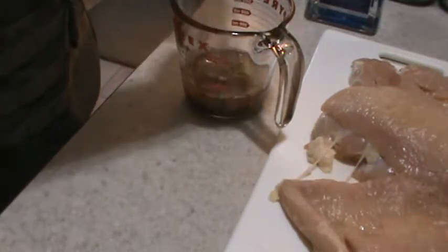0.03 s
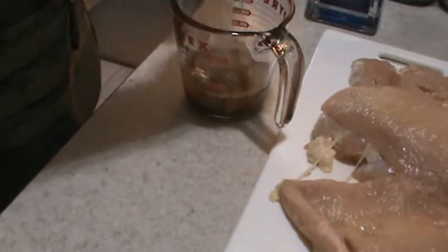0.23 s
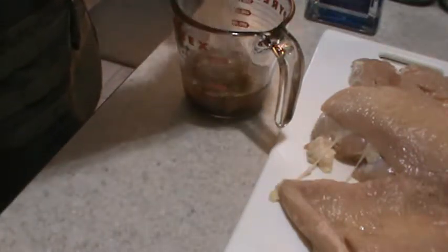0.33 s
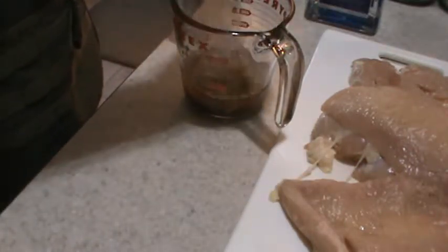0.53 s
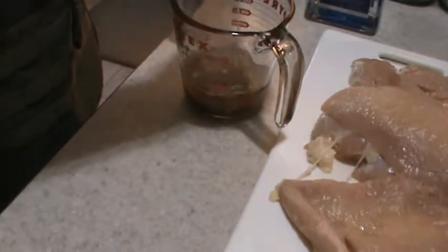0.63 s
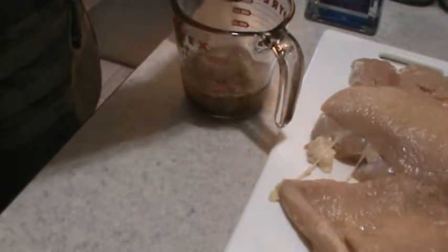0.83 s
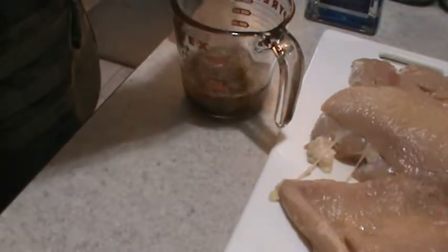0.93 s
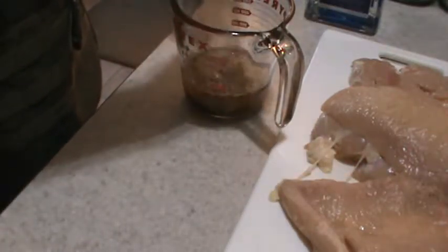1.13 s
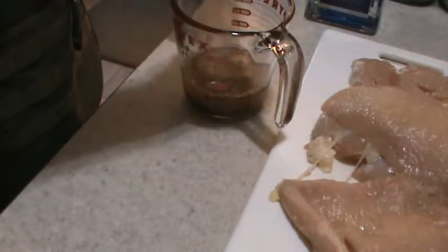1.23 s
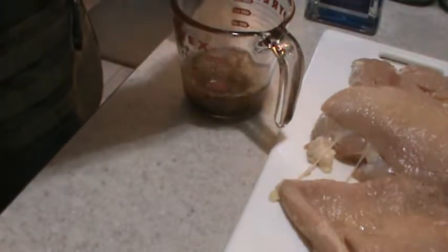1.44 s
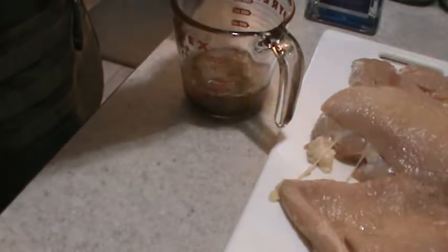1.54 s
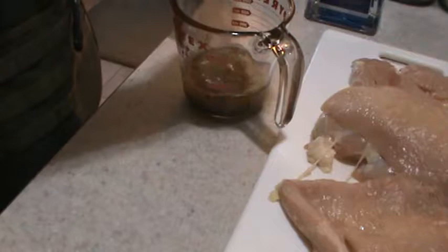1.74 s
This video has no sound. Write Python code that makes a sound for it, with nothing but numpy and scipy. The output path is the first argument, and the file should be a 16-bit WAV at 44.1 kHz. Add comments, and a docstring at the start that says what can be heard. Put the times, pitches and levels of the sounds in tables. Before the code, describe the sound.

Thick sauce splutters from a nearly empty squeeze bottle into a glass cup.

```python
"""Thick sauce is squeezed from a nearly empty bottle into a glass measuring cup on a kitchen counter.
Fingers shift their grip, then air and sauce splutter through the nozzle: bubbles pop in a crackling
spray while the air in the bottle gulps. As the flow dies, the last drips make the glass ring faintly.
The nozzle draws air again with sticky ticks, one with a splashy tail; a soft bump and faint finger rubs
come near the end. An appliance hums in the small room throughout."""
import sys
import numpy as np
from scipy import signal
from scipy.fft import rfft, irfft
from scipy.io import wavfile

SR = 44100
rng = np.random.default_rng(int(sys.argv[2]) if len(sys.argv) > 2 else 0)


def generate_wav(sig):
    """Save sig (samples, or channels by samples) to the path in sys.argv[1] as 16-bit PCM at SR."""
    pcm = np.round(np.clip(np.atleast_2d(sig).T, -1, 1) * 32767).astype(np.int16)
    wavfile.write(sys.argv[1], SR, pcm)


N = 79380
T = np.arange(N) / SR

# Bubbles bursting at the nozzle. Each row: start in seconds, pitch in Hz, ring level in dB,
# decay in seconds, wet crack against the ring in dB before CRACK_TRIM_DB.
NOZZLE_POPS = [(.1025, 4030, -38.5, 0.00061, -26), (.127, 4100, -36.5, 0.00067, -25),
               (.145, 6900, -37.5, 0.002, -32), (.1655, 6150, -38, 0.0037, -9),
               (.2015, 1920, -32, 0.0014, 7.5), (.2185, 7400, -29, 0.0018, -2),
               (.2218, 3680, -15, 0.0012, -3), (.2232, 2570, -15.5, 0.0017, -1),
               (.2297, 2190, -14, 0.0013, -5), (.2472, 3020, -17.5, 0.00038, -4),
               (.2765, 2940, -13, 0.0014, -6), (.2893, 2455, -9.5, 0.00086, -4),
               (.3448, 2247, -19.5, 0.0027, 2.5), (.366, 4680, -29.5, 0.0049, 7),
               (.3728, 6880, -23.5, 0.0035, 3.5), (.4177, 2690, -15, 0.00056, -0.5),
               (.4238, 3560, -29, 0.001, -11), (.4398, 6640, -30.5, 0.0017, 10),
               (.438, 1220, -32.5, 0.0056, -10), (.474, 9120, -21, 0.0028, 5.5),
               (.5098, 6940, -19.5, 0.002, 6.5), (.526, 5750, -28, .002, -5),
               (.5365, 4500, -15.5, 0.00069, -2), (.544, 9370, -18, 0.00069, -2),
               (.576, 2290, -32, 0.00091, 15.5), (.5938, 6700, -20.5, 0.00075, -11),
               (.6792, 3040, -36, 0.0026, 9), (.6913, 2040, -35.5, 0.00091, -14),
               (.7039, 7000, -50, 0.002, 16), (.7418, 2450, -32, 0.0014, 3), (.7487, 4300, -42, 0.0017, 11),
               (.782, 1240, -38, 0.0031, 5), (.792, 3720, -38.5, 0.0007, 6.5)]
# Sticky ticks as the nozzle draws air again. Each row: start in seconds, pitch in Hz,
# ring level in dB, wet crack against the ring in dB before CRACK_TRIM_DB.
STICKY_TICKS = [(.883, 10070, -37.5, 2), (0.9008, 13300, -26, 5), (0.9009, 10100, -32, -15),
                (.950, 12530, -37, 2.5), (1.0207, 2400, -52, 7), (1.1753, 5000, -53, 17),
                (1.2845, 2330, -51, 5), (1.4653, 2270, -39.5, 12), (1.6873, 9120, -29.5, -9),
                (1.689, 3940, -38.5, -9)]
POP_ATTACK_S, POP_RISE_OCT_PER_S, POP_WOBBLE_OCT, TICK_DECAY_S = 0.001264, 20, 0.07, 0.00097
CRACK_LOW_RATIO, CRACK_TOP_RATIO = 0.82, 3.6  # band edges as multiples of the bubble's pitch
CRACK_TRIM_DB, CRACK_DULL_HZ = -7, 13000

# The spray's fader. Each row: time in seconds, level in dB.
SPRAY_FADER = [(.07, -68), (.11, -54.5), (.19, -50.5), (.225, -37), (.263, -38), (.272, -26), (.298, -30),
               (.315, -35), (.55, -35.5), (.59, -41), (.615, -53.5), (.79, -58), (.85, -61)]
# The spray's EQ. Each row: frequency in Hz, relative gain in dB.
SPRAY_EQ = [(50, -18), (150, -3.5), (430, -9.5), (1200, -7), (1600, -9), (2300, 0.5), (3000, -4.5),
            (3450, -13), (4200, 0), (5000, 1), (5800, -8.5), (7400, -1.5), (8600, -8.5), (9600, -2.5),
            (14500, -15), (16000, -24)]
PEAK_DROPS_PER_S, DROP_SPREAD_DB, DROP_DECAY_CYCLES, DROP_LOW_HZ = 3800, 2, 4, 1103
MIST_DB, SPRAY_SIDE_DB = -6.5, -13.5
TOP_HZ = 15850  # the highest droplet, and the top of the whole mix

# Gulps of air in the bottle. Each row: start in seconds, pitch in Hz, peak in dB before low cut and pan.
AIR_GULPS = [(.3025, 707, -21.5), (.339, 723, -26.5), (.363, 675, -17.5), (.3835, 595, -19),
             (.443, 714.5, -24), (.456, 633, -22), (.471, 716, -20.5), (.531, 707, -28.5),
             (.5745, 629, -16), (.6205, 655, -34.5)]
GULP_ATTACK_S, GULP_DECAY_S, GULP_RISE_OCT_PER_S = 0.003, 0.0035, 3.7
GURGLES_PER_S, GURGLE_LOW_HZ, GURGLE_HIGH_HZ, GURGLE_VS_RUSH_DB = 200, 589, 797, -2.5
# The fader for air rushing over the bottle's cavity. Each row: time in seconds, level in dB.
RUSH_FADER = [(.06, -65.5), (.268, -58.5), (.30, -40.5), (.48, -39.5), (.61, -46), (.655, -55.5),
              (.70, -61.5), (.85, -64)]
# The cavity's resonances. Each row: centre in Hz, nominal width in Hz, relative level in dB.
CAVITY_MODES = [(658, 96, -5), (774, 72, 1), (1220, 120, -9.5)]
BOTTLE_LEFT_VS_RIGHT_DB = -4

# Drips landing in the cup. Each row: start in seconds, pitch in Hz, strength of the hit in dB.
CUP_DRIPS = [(.598, 5100, -40.5), (0.7429, 2445, -36), (.7492, 5100, -39.5), (0.782, 1305, -46),
             (.903, 3447, -42)]
# The modes of the glass. Each row: pitch in Hz, gain on the hit in dB, time to fall 60 dB in seconds.
GLASS_MODES = [(1287, -8, .3), (2410, -6, 0.059), (3290, -4, 0.034), (3590, -15.5, 0.14),
               (5075, 7.5, 0.031)]
DRIP_LOSS_DB_PER_OCT = 20

# The modes of a bump on the counter. Each row: pitch in Hz, peak in dB, decay in seconds.
BUMP_MODES = [(139, -46.5, 0.036), (301, -51, 0.019)]
BUMP_START_S, BUMP_ATTACK_S = 1.494, 0.026
# Soft swells of noise: finger rubs, and the splashy tail of the tick at 1.47 s.
# Each row: middle in seconds, half length in seconds, band centre in Hz, level in dB.
NOISE_SWELLS = [(0.115, 0.037, 1250, -52), (1.481, 0.033, 3480, -57.5), (1.676, 0.025, 1210, -59),
                (1.79, 0.014, 4630, -55)]

# The appliance's hum. Each row: frequency in Hz, rms level in dB.
HUM_PARTIALS = [(59.2, -70), (177.6, -61.5), (236.9, -72.5), (592.2, -65.5), (651.4, -65.5), (710.6, -73.5)]
# The room tone's EQ. Each row: frequency in Hz, relative gain in dB.
ROOM_TONE_EQ = [(18, -29), (54, -13), (148, -11.5), (180, -5), (207, -15.5), (245, -13), (581, -15.5),
                (1410, -21.5), (4680, -24), (15500, -25.5)]
# The room tone's stereo width. Each row: frequency in Hz, side against mid in dB.
ROOM_TONE_WIDTH = [(40, -24), (130, -10), (300, -3.5), (1000, 1.5), (15000, -9)]
ROOM_TONE_DB = -55.5
EARLY_DB, EARLY_T60_S, REVERB_DB, REVERB_T60_S = -9.5, 0.012, -12.5, 0.17
ECHO_TOP_HZ, ECHO_SIDE_DB = 3970, -6.5


def bubble_pops(rows):
    """Each bursting bubble rings briefly while its film tears with a wet crack."""
    out = np.zeros(N)
    for start_s, hz, db, decay_s, crack_db in rows:
        tone, envelope = ring(hz, POP_ATTACK_S, decay_s, POP_RISE_OCT_PER_S, POP_WOBBLE_OCT)
        tear = cut(rng.standard_normal(SR // 10), hz * CRACK_LOW_RATIO, "high", order=4)
        tear = cut(tear, hz * CRACK_TOP_RATIO, "low", order=1)
        tear = cut(tear, max(CRACK_DULL_HZ, hz), "low")  # the wet film dulls the very top
        crack = envelope * np.resize(unit_rms(tear), len(envelope))
        add(out, start_s, from_db(db) * (tone + from_db(crack_db + CRACK_TRIM_DB) * crack))
    return out


def sticky_ticks():
    """The nozzle draws air again with tiny, tight pops."""
    return bubble_pops([(s, hz, db, TICK_DECAY_S, crack_db) for s, hz, db, crack_db in STICKY_TICKS])


def spray():
    """Tiny bubbles of every size crackle in a fine mist; they thin to single specks as the flow dies."""
    flow = level(SPRAY_FADER)
    density = np.sqrt(flow / flow.max())
    sizes = from_db(DROP_SPREAD_DB * np.minimum(rng.exponential(1, N), 4)) * rng.choice([-1, 1], N)
    clicks = sizes * (rng.random(N) < density * PEAK_DROPS_PER_S / SR)
    pitches = np.geomspace(DROP_LOW_HZ, TOP_HZ, 40)
    pitch_index = rng.choice(len(pitches), N, p=pitches / pitches.sum())
    drops = np.zeros(N)
    for k, hz in enumerate(pitches):  # each click rings one bubble for a few cycles
        radius, angle = np.exp(-hz / (DROP_DECAY_CYCLES * SR)), 2 * np.pi * hz / SR
        resonator = [1, -2 * radius * np.cos(angle), radius * radius]
        drops += np.sqrt(hz) * signal.lfilter([1, 0, -1], resonator, clicks * (pitch_index == k) + 1e-18)
    makeup_gain = np.sqrt(density.mean() / density)  # sparse drops still follow the fader
    drops = unit_rms(eq(drops, SPRAY_EQ)) * makeup_gain
    mist, side = unit_rms(eq(rng.standard_normal((2, N)), SPRAY_EQ))
    return flow * stereo(drops + from_db(MIST_DB) * mist, from_db(SPRAY_SIDE_DB) * side)


def bottle_air():
    """The air in the bottle gulps each time the nozzle clears, and resonates in between."""
    gulps = gurgle()
    for start_s, hz, db in AIR_GULPS:
        add(gulps, start_s, from_db(db) * ring(hz, GULP_ATTACK_S, GULP_DECAY_S, GULP_RISE_OCT_PER_S)[0])
    rush = np.zeros(N)
    for hz, width_hz, db in CAVITY_MODES:
        b, a = signal.iirpeak(hz, hz / (2 * width_hz), fs=SR)
        band = signal.lfilter(b, a, rng.standard_normal(N))
        rush += from_db(db) * unit_rms(signal.lfilter(b, a, band))  # filtered twice for steeper skirts
    return cut(gulps + level(RUSH_FADER) * unit_rms(rush), hz=534, kind="high", order=8)


def gurgle():
    """Small blups of scattered pitch fill in around the gulps, riding the level of the rushing air."""
    out, rush = np.zeros(N), level(RUSH_FADER)
    for when, pitch_share in rng.random((int(GURGLES_PER_S * N / SR), 2)):
        hz = GURGLE_LOW_HZ * (GURGLE_HIGH_HZ / GURGLE_LOW_HZ) ** pitch_share
        blup = ring(hz, GULP_ATTACK_S, GULP_DECAY_S, GULP_RISE_OCT_PER_S)[0]
        add(out, when * N / SR, from_db(GURGLE_VS_RUSH_DB) * rush[int(when * N)] * blup)
    return out


def drips_on_glass():
    """Drips land in the cup; each drives the glass hardest at the modes near its own pitch."""
    out = np.zeros(N)
    for start_s, drip_hz, drip_db in CUP_DRIPS:
        for hz, mode_db, t60_s in GLASS_MODES:
            loss_db = DRIP_LOSS_DB_PER_OCT * abs(np.log2(hz / drip_hz))
            envelope = from_db(drip_db + mode_db - loss_db - 60 * T / t60_s)
            add(out, start_s, envelope * np.sin(2 * np.pi * hz * T))
    return out


def counter_bump():
    """A dull knock on the counter: low modes with a soft attack."""
    out = np.zeros(N)
    for hz, db, decay_s in BUMP_MODES:
        add(out, BUMP_START_S, from_db(db) * ring(hz, BUMP_ATTACK_S, decay_s)[0])
    return out


def rubs_and_splash():
    """Soft swells of noise: finger rubs, and the splashy tail of the tick at 1.47 s."""
    out = np.zeros(N)
    for middle_s, half_s, hz, db in NOISE_SWELLS:
        band = cut(rng.standard_normal(N), hz / np.sqrt(2), "high")
        band = cut(band, hz * np.sqrt(2), "low")
        swell = np.exp(-((T - middle_s) / half_s) ** 2)
        out += from_db(db) * swell * unit_rms(band)
    return out


def reflections(x, t60_s):
    """Dense, darkened echoes start after a millisecond and die away, spread between the ears."""
    noise = cut(rng.standard_normal((2, N)), ECHO_TOP_HZ, "low", order=1)
    echoes = noise * from_db(-60 * T / t60_s) * (T > .001)
    mid, side = echoes / np.sqrt(np.sum(echoes ** 2, axis=1, keepdims=True))
    return signal.fftconvolve(x[None], stereo(mid, from_db(ECHO_SIDE_DB) * side), axes=1)[:, :N]


def hum_and_room_tone():
    """The mains hum of an appliance over a quiet bed of room noise."""
    hum = sum(np.sqrt(2) * from_db(db) * np.sin(2 * np.pi * (hz * T + rng.random()))
              for hz, db in HUM_PARTIALS)
    mid, side = rng.standard_normal((2, N))
    room_tone = eq(stereo(mid, eq(side, ROOM_TONE_WIDTH)), ROOM_TONE_EQ)
    return hum + from_db(ROOM_TONE_DB) * unit_rms(room_tone)


def ring(hz, attack_s, decay_s, rise_oct_per_s=0, wobble_oct=0):
    """A sine that swells and dies, with optional pitch rise and wobble; returns tone and envelope."""
    t = np.arange(int((attack_s + 10 * decay_s) * SR)) / SR
    attack = np.sin(np.pi / 2 * np.minimum(t / attack_s, 1)) ** 2
    envelope = attack * np.exp(-(np.maximum(t - attack_s, 0) / decay_s) ** 0.82)
    wobble = wobble_oct * np.interp(t * hz / 2, np.arange(200), rng.standard_normal(200))
    pitch_hz = hz * 2 ** (rise_oct_per_s * t + wobble)
    return envelope * np.sin(2 * np.pi * np.cumsum(pitch_hz) / SR), envelope


def from_db(db):
    """Decibels to gain."""
    return 10 ** (np.asarray(db) / 20)


def unit_rms(x):
    """Scale to unit power."""
    return x / np.sqrt(np.mean(x ** 2) + 1e-20)


def level(fader):
    """Gain over time from (s, dB) points, silent outside them."""
    return from_db(np.interp(T, *np.transpose(fader), left=-120, right=-120))


def eq(x, points):
    """Shape a sound by (Hz, dB) points."""
    hz, db = np.transpose(points)
    curve_db = np.interp(np.log(np.fft.rfftfreq(N, 1 / SR) + 1), np.log(hz), db)
    return irfft(rfft(x) * from_db(curve_db), N)


def cut(x, hz, kind, order=2):
    """Butterworth low- or high-pass."""
    return signal.sosfilt(signal.butter(order, min(hz, SR / 2 - 1000), kind, fs=SR, output="sos"), x)


def stereo(mid, side):
    """Left and right from mid and side."""
    return np.array([mid + side, mid - side])


def add(out, start_s, sound):
    """Mix a sound in at a time."""
    i = int(start_s * SR)
    out[i:i + len(sound)] += sound[:N - i]


def scene():
    """The splutter up front, its echoes from cup, counter and walls, and the background."""
    pops = sticky_ticks() + bubble_pops(NOZZLE_POPS)
    gulps, hiss = bottle_air(), spray()
    pan = from_db(np.array([[BOTTLE_LEFT_VS_RIGHT_DB], [-BOTTLE_LEFT_VS_RIGHT_DB]]) / 2)
    early = from_db(EARLY_DB) * reflections(pops, EARLY_T60_S)
    reverb = from_db(REVERB_DB) * reflections(pops + gulps + hiss.mean(axis=0), REVERB_T60_S)
    sauce = pops + drips_on_glass() + pan * gulps + hiss
    return sauce + early + reverb + counter_bump() + rubs_and_splash() + hum_and_room_tone()


def record(dry):
    """A steep high cut on the whole mix."""
    return signal.sosfilt(signal.ellip(10, .1, 80, TOP_HZ, fs=SR, output="sos"), dry)


dry = scene()
out = record(dry)
generate_wav(out)
```